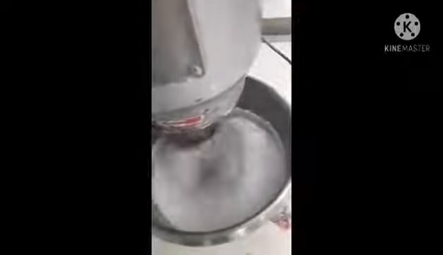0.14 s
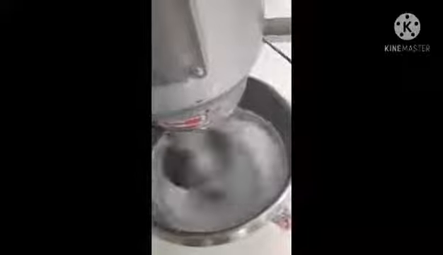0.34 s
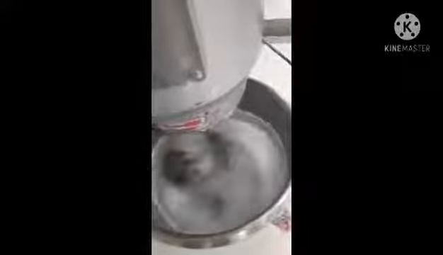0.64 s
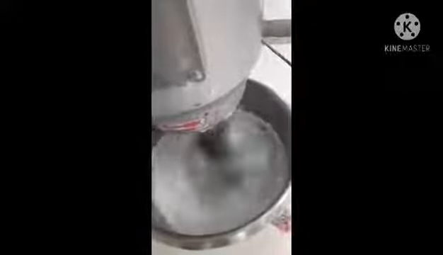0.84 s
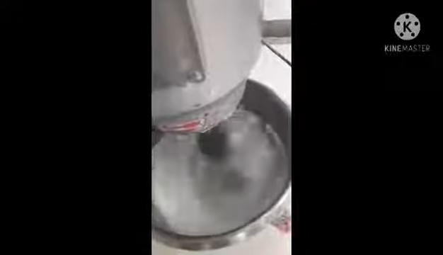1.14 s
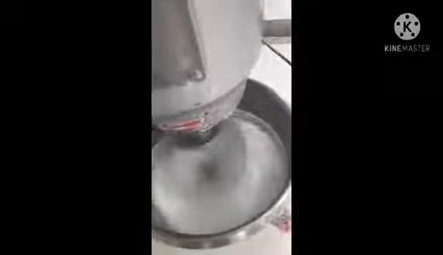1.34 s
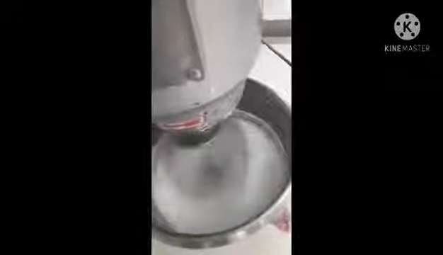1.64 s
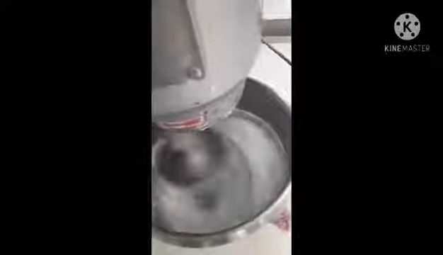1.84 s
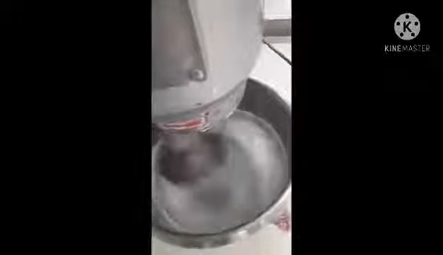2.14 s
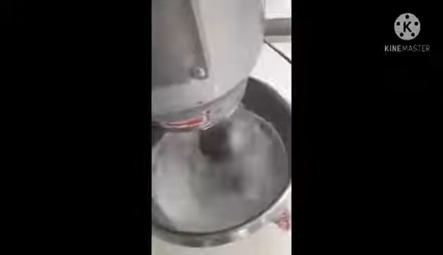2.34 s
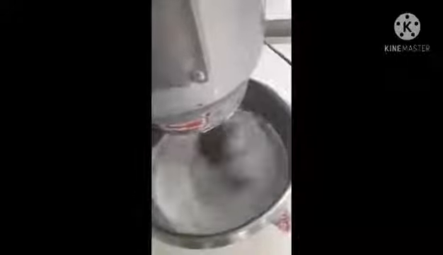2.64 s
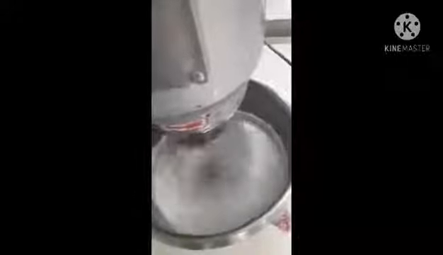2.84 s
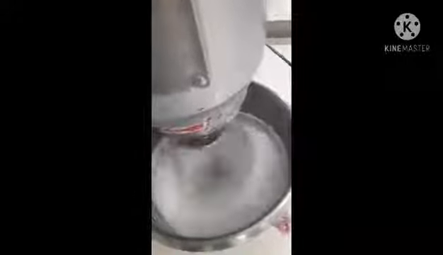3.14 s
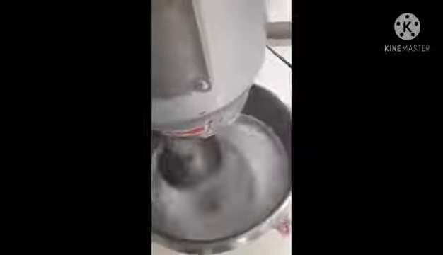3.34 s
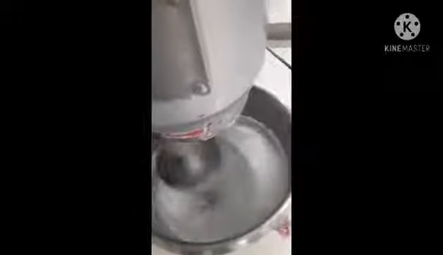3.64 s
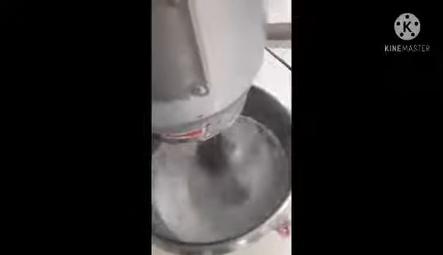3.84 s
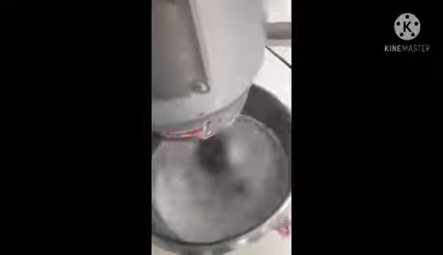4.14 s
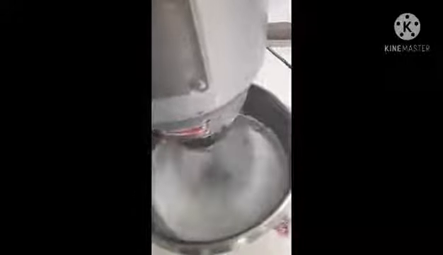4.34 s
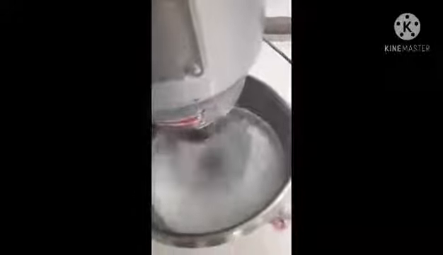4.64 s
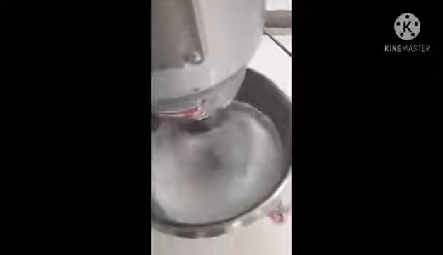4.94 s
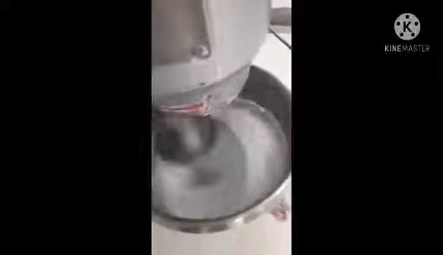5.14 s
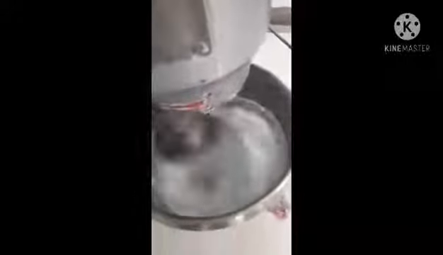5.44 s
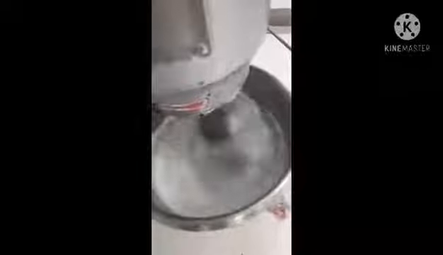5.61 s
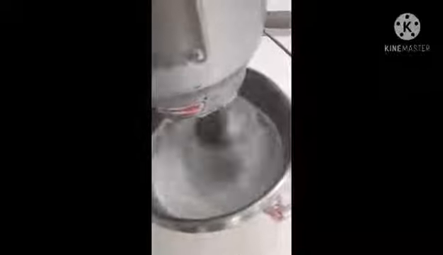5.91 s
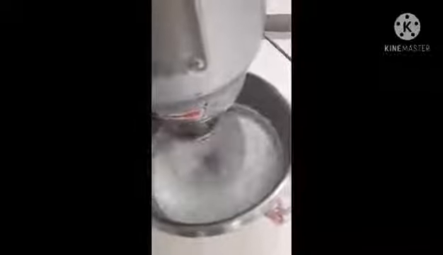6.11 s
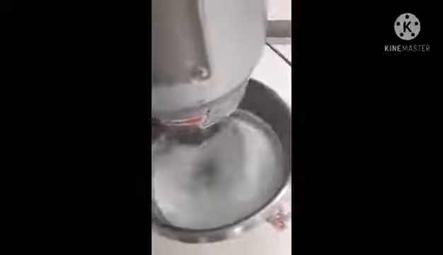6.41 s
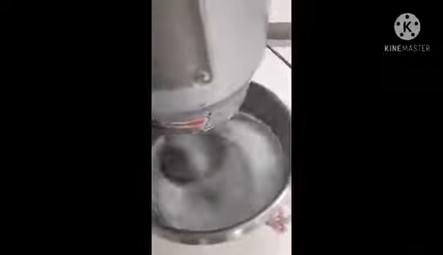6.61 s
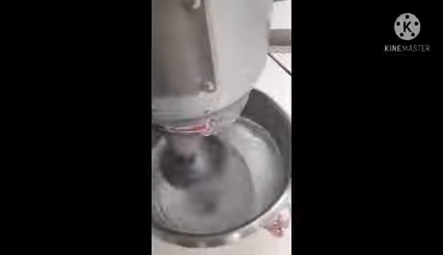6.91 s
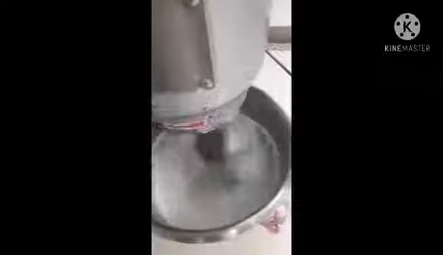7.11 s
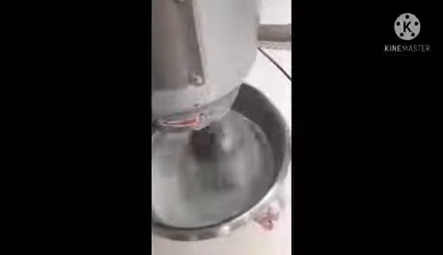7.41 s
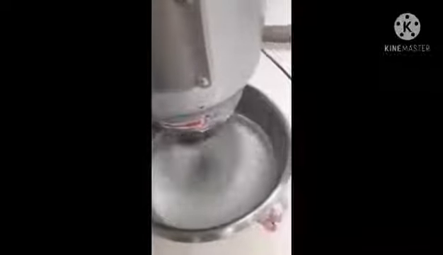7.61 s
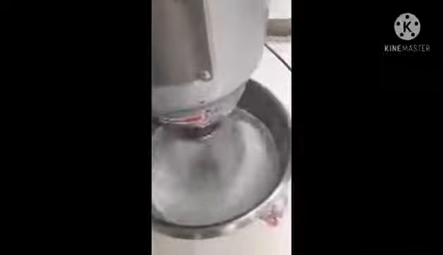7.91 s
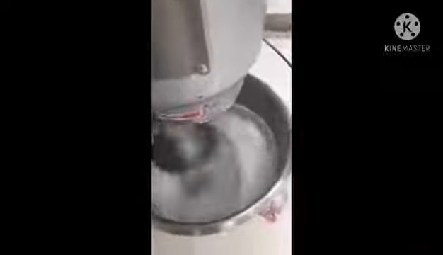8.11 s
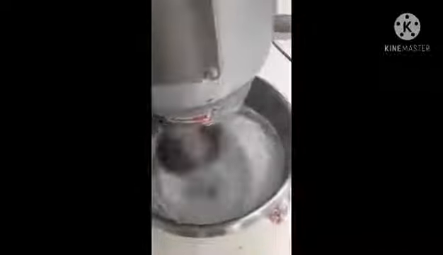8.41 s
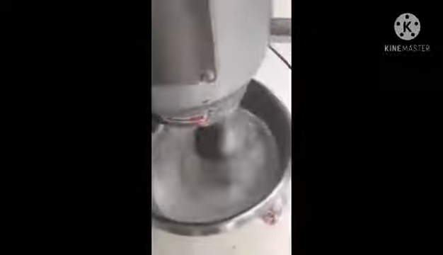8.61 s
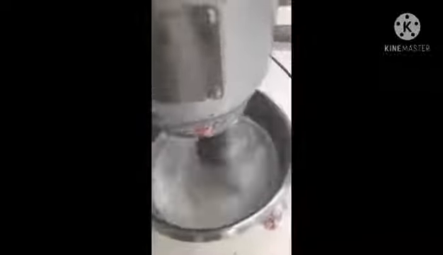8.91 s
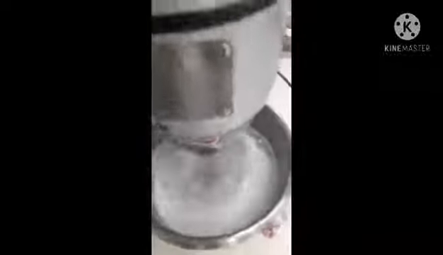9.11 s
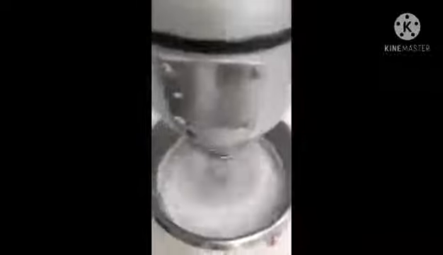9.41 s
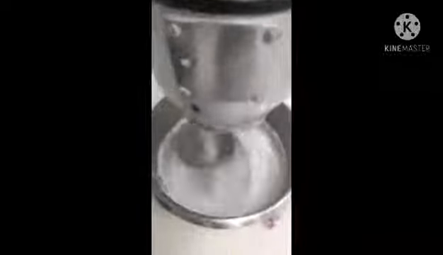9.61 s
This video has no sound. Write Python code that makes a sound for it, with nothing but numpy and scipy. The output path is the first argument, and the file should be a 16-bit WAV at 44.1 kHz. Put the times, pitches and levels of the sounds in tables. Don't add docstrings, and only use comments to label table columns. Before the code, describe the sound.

Already running at the start and still running at the end, a kitchen mixer whips a wet mixture in a metal bowl. The whisk makes a fast fluttering churn, hollow body thumps and hissy spatter, uneven from stroke to stroke. Motor hum stays level; occasional short wire taps hit the bowl. Very close, dry stereo microphone, highs dropping out in small patches like low-quality compression.

```python
import sys
import numpy as np
from scipy import signal
from scipy.fft import rfft, irfft
from scipy.io import wavfile
from scipy.ndimage import uniform_filter1d

SR = 44100
rng = np.random.default_rng(int(sys.argv[2]) if len(sys.argv) > 2 else 0)


def materialize(psi):
    bounded = np.clip(np.atleast_2d(psi).T, -1, 1)
    quanta = np.round(bounded * 32767).astype(np.int16)
    wavfile.write(sys.argv[1], SR, quanta)


def level_to_linear(level):
    exponent = np.asarray(level, float) / 20
    return 10 ** exponent


N = 429975
WHISK_HZ, ORBIT_HZ, ROTOR_HZ = 11.487, 3.35, 118.5
GEAR_TEETH, WHISK_WIRES = 19, 6


def rms_one(x):
    return x / np.sqrt(np.mean(x ** 2) + 1e-20)


def at_hz(points, hz):
    table_hz, value = np.transpose(points)
    return np.interp(np.log(hz), np.log(table_hz), value)


def drift(rate_hz):
    r = np.exp(-2 * np.pi * rate_hz / SR)
    noise = rng.standard_normal(N + SR)
    return rms_one(signal.lfilter([1], [1, -2 * r, r * r], noise)[SR:])


def sides(lean_db):
    return level_to_linear(np.multiply.outer([.5, -.5], lean_db))


def resonance(x, hz, width_hz):
    r = np.exp(-np.pi * abs(width_hz) / SR)
    zeros = np.array([1, 0, -1]) * (1 - r * r) / 2
    poles = [1, -2 * r * np.cos(2 * np.pi * hz / SR), r * r]
    return signal.lfilter(zeros, poles, x)


# frequency in Hz, correlation from 0 to 1.
LIKENESS = [(60, 0.78), (220, 0.97), (370, 1), (620, 0.77), (1000, 0.65), (1750, 0.091), (2400, 0.36),
            (3300, 0.074), (6300, 0.053), (13000, 0.19)]
# frequency in Hz, lead in radians.
LEAD = [(0, 0.01), (300, 0.15), (1380, 1.04), (1640, 0.083), (2410, 8.25), (2930, 5.9), (3880, 4.9),
        (5000, 7.35), (7410, 11.1), (9470, 12.2), (14000, 1.4)]


def pair(gain):
    hz = np.maximum(np.fft.rfftfreq(N, 1 / SR), 1)
    mid, side = rfft(rng.standard_normal((2, N)) * gain)
    alike = np.clip(at_hz(LIKENESS, hz), -1, 1)
    lead_rad = np.interp(hz, *np.transpose(LEAD))
    lead = np.exp(.5j * np.multiply.outer([1, -1], lead_rad))
    mix = np.sqrt(1 + alike) * mid + np.sqrt(1 - alike) * side * [[1], [-1]]
    return hz, lead * mix / np.sqrt(2)


# frequency in Hz, left over right in dB.
LEAN = [(60, -6.5), (500, 5), (730, -3), (1200, 0.1), (2200, 1.5), (4100, -1), (6500, 4.5), (8700, -20),
        (10200, 0), (12500, -6)]


def coloured(gain, spectrum, flutter_db, octaves):
    hz, both = pair(gain)
    both = both * rms_one(level_to_linear(at_hz(spectrum, hz))) * sides(at_hz(LEAN, hz))
    octave = np.clip(np.log2(hz / 500), 0, octaves - 1)
    out = 0
    for k in range(octaves):
        band = irfft(both * np.clip(1 - abs(octave - k), 0, 1), N)
        flutter = level_to_linear(flutter_db * drift(40.0))
        out = out + flutter * rms_one(gain) ** (-.15 * abs(k - 2)) * band
    return out


# frequency in Hz, density in dB per Hz.
RUMBLE = [(15, -67), (25, -79), (54, -16), (108, -1.5), (167, -0.5), (210, -3), (270, -12), (460, -120)]


def motor():
    t = np.arange(N) / SR
    rotor = np.sin(2 * np.pi * (ROTOR_HZ * t + 0.15 * drift(0.62)))
    rotor = rotor * level_to_linear(-42.5 + 2.0 * drift(1.7))
    throb = 1 + 0.95 * np.cos(2 * np.pi * WHISK_HZ * t + 1.1)
    mesh = np.sin(2 * np.pi * (GEAR_TEETH * WHISK_HZ * t + 0.19 * drift(3.0)))
    mesh = mesh * level_to_linear(-28.5 + 1.8 * drift(4.1)) * throb
    rumble = level_to_linear(-36.0) * coloured(np.ones(N), RUMBLE, flutter_db=.3, octaves=1)
    return rumble + rotor * sides(-3.0)[:, None] + mesh * sides(-1.8)[:, None]


# frequency in Hz, width in Hz, rms level in dB, left over right in dB.
BOWL = [(599, 10, -55, 4), (773, 5, -48, 2), (876, 16, -51, 0), (894, 6, -47, 1), (1090, 20, -58, 1),
        (1519, 16, -53, 3)]


def bowl():
    orbit = np.cos(2 * np.pi * ORBIT_HZ * np.arange(N) / SR - 1.4)
    rub = level_to_linear(1.3 * orbit) * rng.standard_normal(N)
    out = np.zeros((2, N))
    for hz, width_hz, level_db, lean_db in BOWL:
        ring = resonance(resonance(rub, hz, width_hz), hz, 3 * width_hz)
        out += level_to_linear(level_db) * sides(lean_db)[:, None] * [[1], [-1]] * rms_one(ring)
    return out


FIRST_STROKE_S, STROKE_JITTER_S = 0.061, 0.0027
SPATTER_DB, SPATTER_SPREAD_DB = -27.5, 0.6
THUMP_DB, THUMP_SPREAD_DB = -20.5, 2.0
# time in seconds, spatter in dB, thump in dB.
ODD_STROKES = [(0.313, -25.5, -15.5), (0.669, -28, -20), (0.926, -27, -17.5), (1.287, -26, -32),
               (1.454, -26, -17.5), (1.962, -25, -20), (2.244, -28.5, -15.5), (2.326, -29.5, -32),
               (2.405, -28, -33), (2.499, -29.5, -18), (3.279, -28.5, -19), (3.531, -25, -15.5),
               (3.732, -24, -20.5), (3.887, -26, -18), (4.319, -27, -22), (4.582, -26.5, -18),
               (4.932, -25, -23), (5.27, -27.5, -16), (5.715, -27, -20.5), (6.063, -27, -26),
               (6.587, -27.5, -16), (7.027, -26, -18), (7.291, -26.5, -17), (7.454, -27.5, -16.5),
               (7.992, -26, -26), (8.161, -25, -21), (8.499, -29, -16.5), (8.687, -27, -29),
               (8.946, -25, -16.5), (9.636, -28, -18)]


def stroke_rows():
    turns = np.arange(int(N / SR * WHISK_HZ) + 1)
    rows = rng.standard_normal((len(turns), 3)) * [STROKE_JITTER_S, SPATTER_SPREAD_DB, THUMP_SPREAD_DB]
    rows += [FIRST_STROKE_S, SPATTER_DB, THUMP_DB]
    rows[:, 0] += turns / WHISK_HZ
    for row in ODD_STROKES:
        rows[round((row[0] - FIRST_STROKE_S) * WHISK_HZ)] = row
    return rows


def strokes(rows, column, between_db, rise_s, fall_s, late_s):
    t = np.arange(N) / SR
    churn = level_to_linear(2 * between_db)
    power = np.full(N, churn)
    for row in rows:
        near = slice(max(int((row[0] - .1) * SR), 0), int((row[0] + .15) * SR))
        since_s = t[near] - row[0] - late_s
        extra = max(level_to_linear(2 * row[column]) - churn, 0)
        power[near] += extra * np.exp(-(since_s / np.where(since_s < 0, rise_s, fall_s)) ** 2)
    return np.sqrt(power)


# frequency in Hz, density in dB per Hz.
SPATTER = [(260, -25), (450, -7.5), (476, -14), (564, -9.5), (726, -5), (935, -7.5), (1390, -9.5),
           (1550, -7.5), (1940, -10.5), (3990, -11.5), (7100, -20.5), (8640, -26.5), (10100, -29.5),
           (12300, -22.5), (13000, -27.5)]


def spatter(rows):
    t = np.arange(N) / SR
    orbit = np.cos(2 * np.pi * ORBIT_HZ * t - 1.3)
    wires = np.cos(2 * np.pi * WHISK_WIRES * WHISK_HZ * t)
    clumps = level_to_linear(1.1 * drift(300.0) + 0.46 * orbit + 0.7 * wires)
    swell = strokes(rows, column=1, between_db=-32.0, rise_s=0.02, fall_s=0.021, late_s=0.00072)
    return level_to_linear(4.0) * coloured(swell * clumps, SPATTER, flutter_db=1.55, octaves=6)


# frequency in Hz, width in Hz, level in dB, left over right in dB.
HOUSING = [(220.6, 46.6, -1.5, -2), (240.2, 24, -1, -1), (251.2, 16, -4.5, -7), (292.7, 44, -0.5, -0.5),
           (326.2, 49.3, -4, -7), (371, 11, -12.5, -14), (376.3, 26, -10, -10), (415.6, 12.6, -16, -16.5),
           (433, 18, -18, 3.5), (672, 58, -16.5, 2), (738, 46, -13, -4)]


def housing(rows):
    gain = strokes(rows, column=2, between_db=-23.5, rise_s=0.014, fall_s=0.02, late_s=-0.001)
    hz, shake = pair(gain * level_to_linear(2.22 * drift(77.0)))
    power = 0
    for top_hz, width_hz, level_db, lean_db in HOUSING:
        peak = 1 / (1 + (2 * (hz - top_hz) / width_hz) ** 2)
        power = power + (level_to_linear(level_db) * sides(lean_db)[:, None] * peak) ** 2
    cepstrum = irfft(np.log(power) / 2, N)
    cepstrum[:, 1:N // 2] *= 2
    cepstrum[:, N // 2:] = 0
    return level_to_linear(23.5) * irfft(shake * np.exp(rfft(cepstrum)), N)


# start in seconds, peak in dB, frequency in Hz.
TICKS = [(0.214, -12, 725), (0.306, -20, 738), (0.501, -13, 730), (0.829, -19, 720), (0.918, -7, 681),
         (2.132, -18, 775), (2.551, -9, 670), (2.742, -17, 738), (2.822, -8.5, 740), (2.898, -8.5, 738),
         (3.269, -17, 695), (3.449, -17, 705), (3.876, -15, 725), (3.96, -14, 676), (4.377, -9.5, 854),
         (4.48, -12, 660), (4.917, -15, 724), (5.097, -21, 820), (5.353, -18, 1560), (5.624, -9, 796),
         (5.685, -20, 689), (7.184, -12, 790), (7.66, -10.5, 710), (8.394, -13, 685), (8.937, -11, 790),
         (9.178, -10, 666), (9.274, -14, 1180), (9.627, -17, 675)]


def ticks():
    out = np.zeros(N)
    for start_s, peak_db, hz in TICKS:
        start = round(start_s * SR)
        t = np.arange(min(600, N - start)) / SR
        ring = np.sin(2 * np.pi * hz * t) * np.exp(-t / 0.0053)
        scrape = 0.8 * rng.standard_normal(len(t)) * np.exp(-t / 0.002)
        out[start:start + len(t)] += level_to_linear(peak_db - 6.5) * (ring + scrape)
    return signal.sosfilt(signal.butter(2, [400, 6000.0], "band", fs=SR, output="sos"), out)


def scene():
    rows = stroke_rows()
    return motor() + bowl() + spatter(rows) + housing(rows) + ticks()


def patches(shape, tall, long):
    chance = rng.standard_normal(shape[1:]) + 1.3 * rng.standard_normal(shape)
    for axis, size in ((1, tall), (2, long)):
        for _ in range(2):
            chance = uniform_filter1d(chance, size, axis)
    return rms_one(chance)


# time in seconds, length in seconds, depth in dB.
STARVED = [
    (1.76, .03, 8),
    (1.95, 0.035, 10),
    (2.6, .03, 6),
    (3.6, 0.027, 10),
    (4.95, 0.093, 10),
    (5.507, .03, 10),
    (6.353, .03, 4),
    (8.173, 0.11, 11),
    (9.14, 0.036, 11),
]


def starving(s):
    short_db = 2.5 * drift(14.0)[np.minimum(s * SR, N - 1).astype(int)]
    for at_s, length_s, depth_db in STARVED:
        short_db = short_db + depth_db * np.exp(-((s - at_s) / length_s) ** 2)
    return short_db


# frequency in Hz, margin in spreads for the sum, for the difference.
MARGIN = [(150, 6, 1.2), (300, 6, 5), (1500, 5, 4), (1950, 2.4, 3.5), (2400, 3, 1.2), (3000, 2.2, 2.2),
          (5000, .9, 1.0), (7000, .4, .4), (8800, 1.3, 1.3), (9700, .2, .2), (10300, -.7, -.7),
          (11300, -.2, -.2), (12400, 1.1, 1.1), (13000, .6, .6)]


def muted(x):
    slope = np.cumsum(np.kaiser(1025, 4 * np.pi))
    slope = np.sqrt(slope[:-1] / slope[-1])
    frame = dict(fs=SR, window=np.r_[slope, slope[::-1]], nperseg=2048, noverlap=1024)
    sum_diff = np.pad([x[0] + x[1], x[0] - x[1]], ((0, 0), (13, 0)))
    hz, s, cells = signal.stft(sum_diff, **frame)
    bin_hz = hz[:, None]

    def banded(bins):
        return patches(cells.shape, 2, 2)[:, ::bins].repeat(bins, 1)[:, :len(hz)]

    high = np.clip((bin_hz - 8800) / 1000, 0, 1)
    chance = banded(10) * (1 - .5 * high) + banded(32) * (.3 + .55 * high)
    starved = 0.15 * (high * np.clip((13500 - bin_hz) / 2000, 0, 1) + .07) * starving(s)
    table_hz, *margins = np.transpose(MARGIN)
    margin = np.array([np.interp(hz, table_hz, m) for m in margins])
    keep = chance + starved < margin[..., None]
    floor = np.clip(0.3 * np.log2(bin_hz / 600 + 1), 0, 1.3) * (bin_hz > 650)
    keep &= abs(cells) > uniform_filter1d(abs(cells), 25, 1) * floor
    coarse = level_to_linear(1.48 * patches(cells.shape, 24, 1) * (bin_hz > 900))
    kept = cells * keep * coarse * (bin_hz < 13050)
    mid, side = signal.istft(kept, **frame)[1][:, 13:N + 13]
    return np.array([mid + side, mid - side]) / 2


def low_pass(x):
    return signal.sosfilt(signal.butter(12, 14370, fs=SR, output="sos"), x)


def record(dry):
    closing = np.clip((N - np.arange(N)) / SR / .003, 0, 1)
    mix = muted(dry * closing)
    return low_pass(mix)


dry = scene()
out = record(dry)
materialize(out)
```